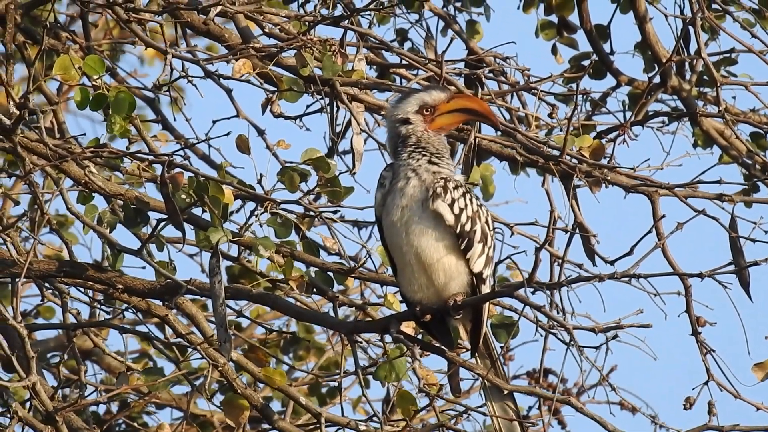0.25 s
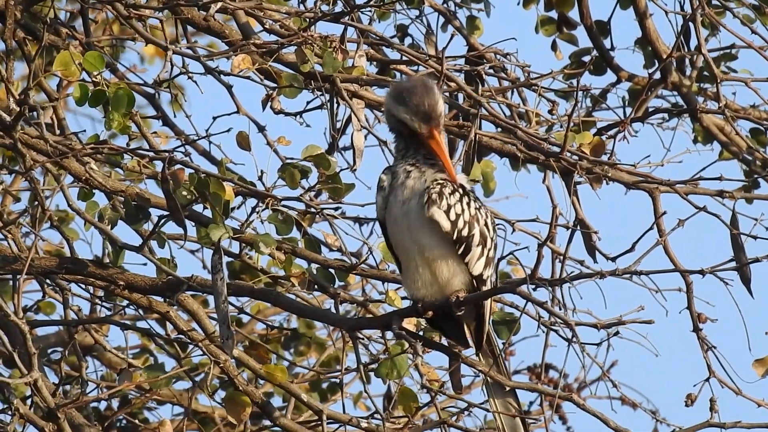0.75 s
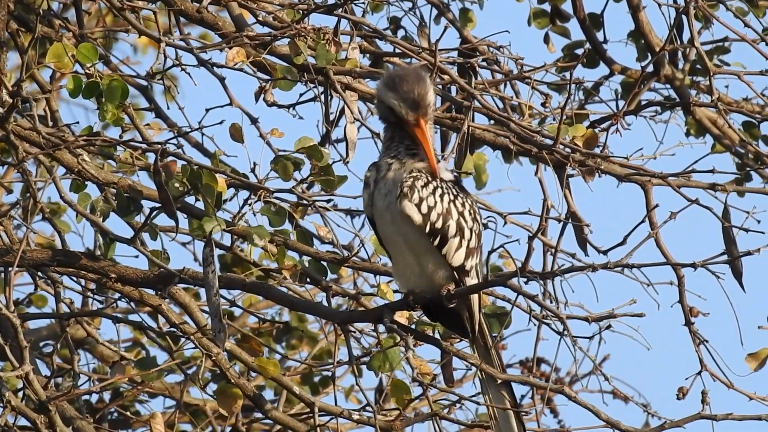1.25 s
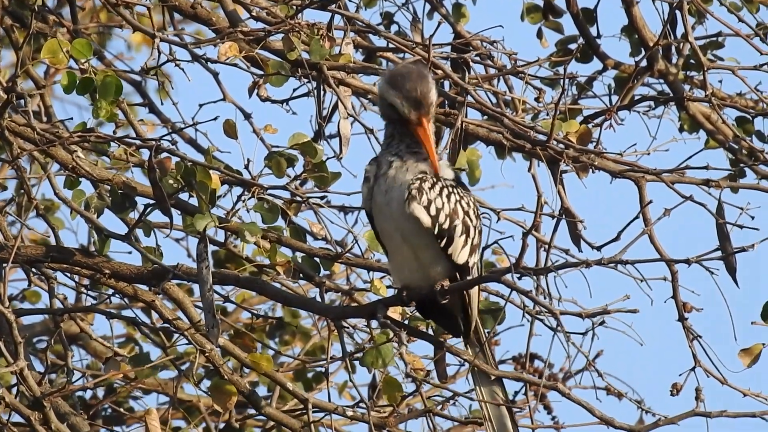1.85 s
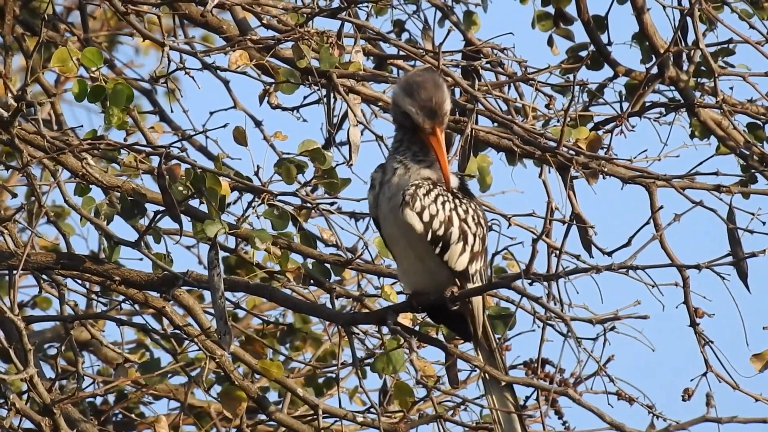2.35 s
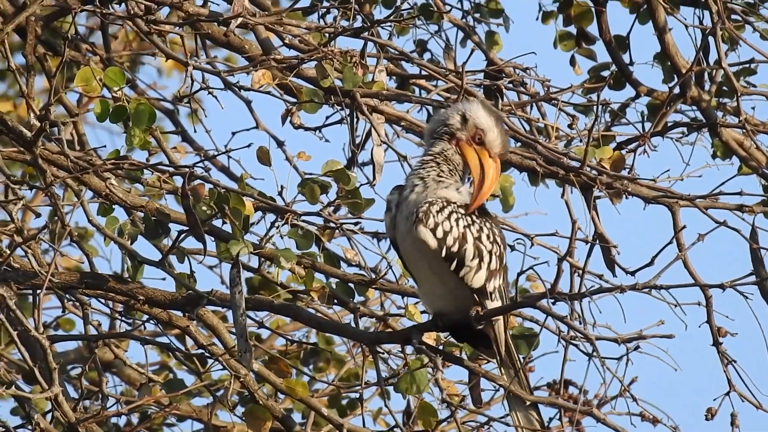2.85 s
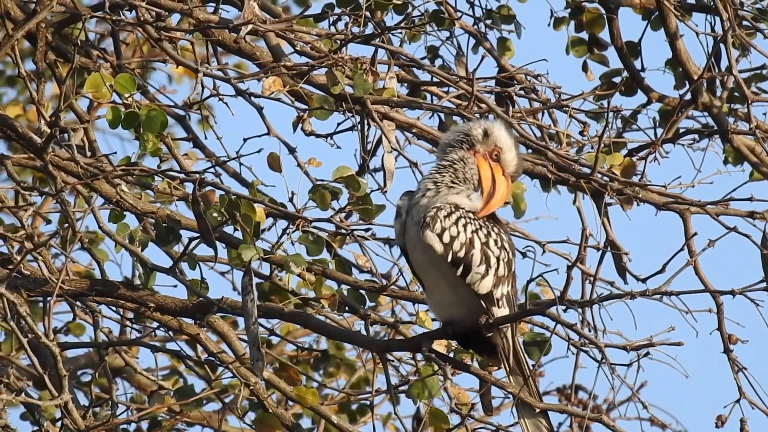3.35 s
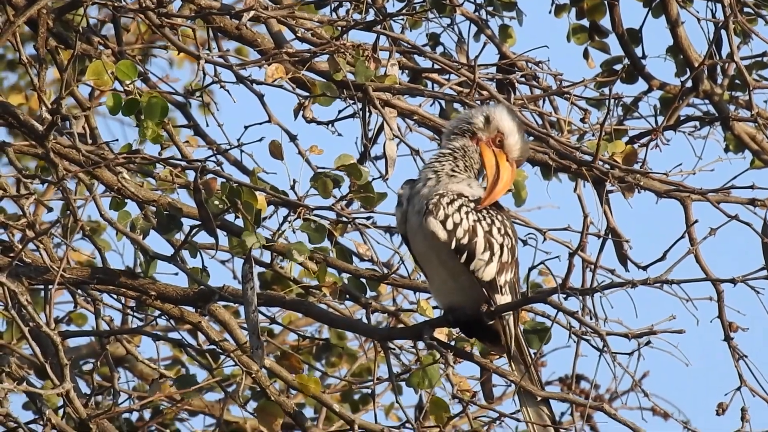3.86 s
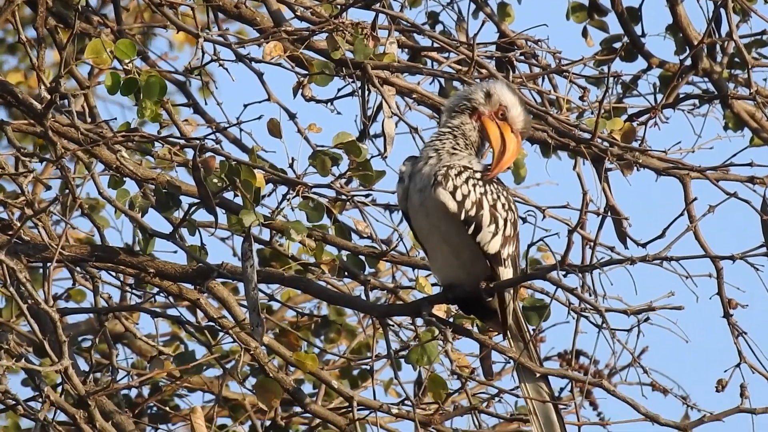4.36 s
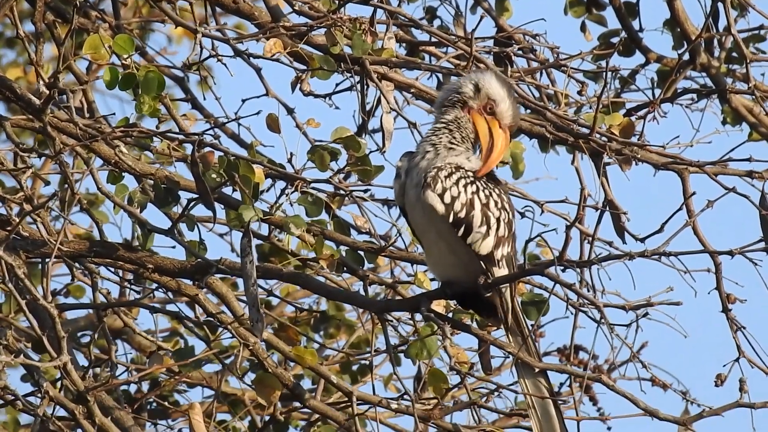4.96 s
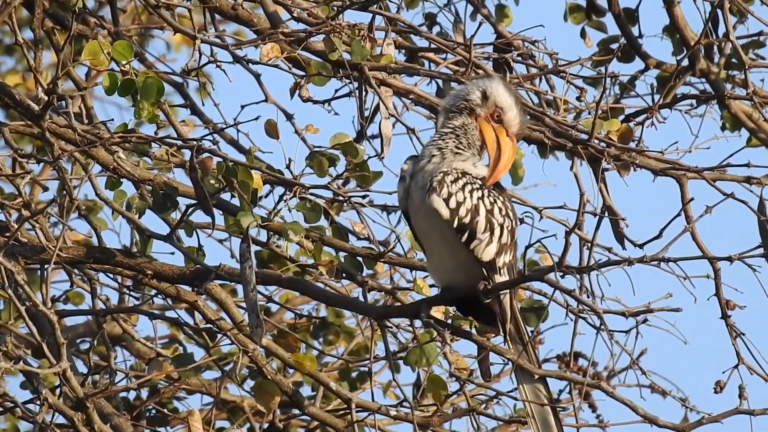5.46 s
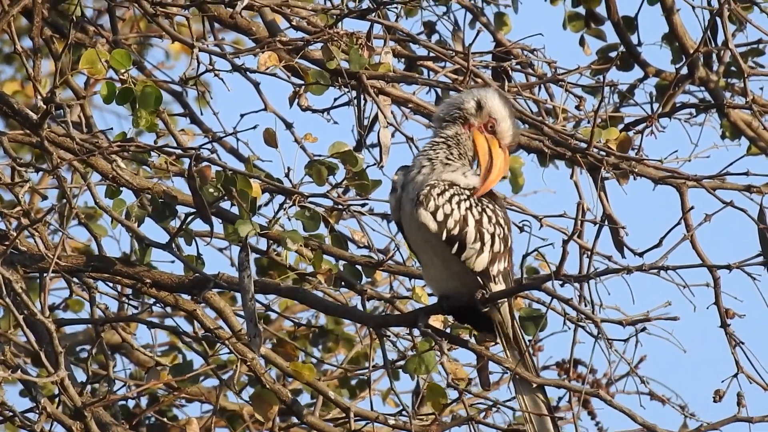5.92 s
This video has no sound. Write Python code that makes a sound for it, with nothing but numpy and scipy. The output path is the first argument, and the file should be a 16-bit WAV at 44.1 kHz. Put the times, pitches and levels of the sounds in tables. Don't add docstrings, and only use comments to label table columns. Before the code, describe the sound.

A hornbill in a tree clucks a long, even run of short hollow notes, echoing through bushland, with one sharp snap past the middle.

```python
import sys
import numpy as np
from scipy import signal
from scipy.fft import rfft, irfft
from scipy.io import wavfile
from scipy.ndimage import uniform_filter1d

SR = 44100
rng = np.random.default_rng(int(sys.argv[2]) if len(sys.argv) > 2 else 0)


def inscribe(sig):
    pcm = np.round(np.clip(np.atleast_2d(sig).T, -1, 1) * 32767)
    wavfile.write(sys.argv[1], SR, pcm.astype(np.int16))


def to_linear_factor(level_db):
    exponent = np.asarray(level_db, float) / 20
    return 10 ** exponent


N = 272979

# (time [s], pitch [Hz], effort [dB])
CLUCKS = [(0.093, 540.2, 0), (0.2545, 535, -1.5), (0.4533, 538, -0.7), (0.6528, 538.2, 0),
          (0.8492, 537, -0.5), (1.0574, 532.3, -0.5), (1.2591, 534, -1), (1.4249, 532.7, 1),
          (1.637, 534.8, 1.35), (1.8438, 532, 0.1), (2.015, 535, 1.5), (2.2105, 535.9, 1.36),
          (2.3722, 533.6, 1), (2.5489, 540.5, 1.66), (2.7353, 535.7, 1), (2.8962, 543.6, 1.06),
          (3.0789, 537.4, 1.5),
          (3.353, 550, 0.39), (3.534, 549.8, 0.32), (3.7668, 540.5, 1.56), (3.952, 538, 1.75),
              (4.1382, 538.5, 1.3), (4.4034, 531.7, 1.1), (4.7866, 535.7, 1.4), (5.0165, 535.7, 0.19),
              (5.232, 533.5, 0.89), (5.4348, 536.6, 1.63), (5.6202, 536.1, 1.6), (5.8173, 538.4, 2.1),
              (6.0083, 538, 1.3), (6.173, 536, 1.2)]
# (start [ms], attack [ms], hold [ms], release [ms], level [dB])
HARMONICS = [
    (-3, 4.94, 22.3, 9, -19.5),
    (2.23, 16.7, 2.62, 9.87, -1.07),
    (0, 7.3, 7, 9.6, -36),
    (1, 2.4, 7.9, 6.8, -41.5),
]
# (start [ms], attack [ms], hold [ms], release [ms], level [dB])
CREAK = [
    (25.8, 4.1, 9.9, 4.4, -29),
    (26.5, 2, 1.1, 6, -40.5),
]
# (start [ms], attack [ms], hold [ms], release [ms], level [dB])
WHEEZE = (22.5, 8, 2, 4, -1.5)
# (frequency [Hz], level [dB])
RASP_SPECTRUM = [(1100, -2.5), (1300, -0.5), (1900, -19), (2250, -8), (2600, -18.5), (6000, -25),
                 (9000, -30.5)]
RASP_DB = -34
RELAXED_HZ, RELAXED_LENGTH, STRETCH_PER_HZ2 = 533, .95, .001
CLUCK_FROM_MS, OPEN_MS, CLUCK_TO_MS = -3, 8, 34
HELD_SHARE, SAG_PER_MS = 1.034, .0032
ONSET_DROP, ONSET_MS, ONSET_WIDTH_MS = 0.395, 1.71, 0.72
CLOSE_DROP, CLOSE_MS, CLOSE_WIDTH_MS = 0.19, 27.85, 1.52


def hornbill():
    out, beam = np.zeros((2, N))
    rasp = to_linear_factor(RASP_DB) * colour(rng.standard_normal(N), RASP_SPECTRUM)
    for s, hz, db in CLUCKS:
        length = RELAXED_LENGTH + STRETCH_PER_HZ2 * max(hz - RELAXED_HZ, 0) ** 2
        t = np.arange(CLUCK_FROM_MS, CLUCK_TO_MS * length, 1000 / SR)
        t = np.where(t > OPEN_MS, OPEN_MS + (t - OPEN_MS) / length, t)

        onset = ONSET_DROP * fall(t, ONSET_MS, ONSET_WIDTH_MS)
        closing = CLOSE_DROP * (1 - fall(t, CLOSE_MS, CLOSE_WIDTH_MS))
        share = HELD_SHARE - SAG_PER_MS * t + onset - closing
        phase = 2 * np.pi * np.cumsum(hz * share) / SR

        low, octave, third, fourth = (swell(t, *row) for row in HARMONICS)
        creak_third, creak_fourth = (swell(t, *row) for row in CREAK)
        gains = [low, octave, creak_third, fourth + creak_fourth]
        voice = sum(gain * np.sin((k + 1) * phase + .84 * k) for k, gain in enumerate(gains))
        breath = np.sqrt(octave) + swell(t, *WHEEZE)
        air_noise = breath * rasp[int(s * SR) // 2:][:len(t)]

        start = s + CLUCK_FROM_MS / 1000
        add(out, to_linear_factor(db) * (voice + air_noise), start)
        add(beam, to_linear_factor(db) * third * np.sin(3 * phase + 1.7), start)
    return out, beam


# (left delay [ms], left gain [ratio], right delay [ms], right gain [ratio])
ECHOES = [(0, 1, 0, .92), (1.48, .47, 1.52, .57), (2.59, .23, 8.24, .23), (10.86, .34, 13.09, .05),
          (20.19, .27, 13.67, .24), (22.85, .14, 16.66, .27), (25.41, .61, 19.16, .18),
          (27.6, .08, 23.62, .44), (28.66, .42, 27.96, .95), (34.92, .11, 31.27, .55),
          (35.7, .09, 31.66, .21), (41.04, .1, 53.37, .08), (51.01, .26, 59.86, .14),
          (52.47, .21, 60.48, .12), (64.4, .08, 64.07, .06)]
SCATTER_DB, SCATTER_T60_S, SCATTER_RISE_S = -19.5, 0.24, 0.07


def surroundings():
    response = to_linear_factor(SCATTER_DB) * scatter(SCATTER_T60_S, SCATTER_RISE_S)
    for side, (ms, gain) in enumerate(np.transpose(ECHOES).reshape(2, 2, -1)):
        response[side, (ms * SR / 1000).round().astype(int)] += gain
    return response


def scatter(t60, rise):
    t = np.arange(SR) / SR
    tail = rng.standard_normal((2, SR)) * patches(SR, 14, 7)
    tail = tail * (1 - np.exp(-(t / rise) ** 2)) * to_linear_factor(-60 * t / t60)
    return tail / np.sqrt(np.mean(np.sum(tail ** 2, axis=1)))


# (frequency [Hz], density [dB per Hz])
SNAP_SPECTRUM = [(120, -36), (200, 2.5), (612, 3), (1100, -4.5), (1500, -3.5), (1770, -12), (1980, 0.5),
                 (2170, -12), (3690, -6.5), (4680, -17), (6640, -14.5), (7270, -17), (14600, -34),
                 (16000, -56)]
# (frequency [Hz], T60 [s])
SNAP_T60 = [(300, 0.16), (2000, 0.22), (6000, 0.16), (15000, 0.22)]
SNAP_S, SNAP_DB, SNAP_PAN_DB, CRACK_DB = 3.6557, -10, -0.5, -4
SNAP_RISE_CYCLES = 8


def snap():
    t = np.arange(SR // 2) / SR
    noise = colour(rng.standard_normal((2, len(t))), SNAP_SPECTRUM)
    spectrum, hz = rfft(noise), np.fft.rfftfreq(len(t), 1 / SR)
    body = np.zeros((2, len(t)))
    for low_hz in 200 * 2. ** np.arange(0, 7):
        octave = irfft(spectrum * (hz >= low_hz) * (hz < 2 * low_hz), len(t))
        decay = to_linear_factor(-60 * t / on_log(1.8 * low_hz, SNAP_T60))
        body += octave * decay * np.minimum(t * low_hz / SNAP_RISE_CYCLES, 1)
    crack = 1 + to_linear_factor(CRACK_DB) * np.exp(-t / .006)
    burst = body * patches(len(t), 2.5, 2.5) * crack * np.minimum(t / .0008, 1)
    out = np.zeros((2, N))
    add(out, burst * to_linear_factor(SNAP_DB + SNAP_PAN_DB * np.array([[1], [-1]])), SNAP_S)
    return out


# (time [s], length [s], level [dB])
PURRS = [
    (1.35, 0.085, -39.5),
    (1.68, 0.44, -38.5),
    (2.04, 0.17, -32.5),
    (2.63, 0.068, -33),
    (3.04, 0.43, -33.5),
    (3.9, 0.049, -27.5),
    (4.308, 0.407, -33),
    (5.091, .1, -32),
    (5.54, 0.42, -32.5),
    (5.98, 0.1, -27),
]
PURR_HZ, PURR_SAG_HZ_PER_S, PURR_SWELL_DB_PER_S, PURR_EDGE_S = 822, 50, 8, .02
PURR_RATE_HZ, PURR_DROOP, PURR_UNEVEN, PURR_SCATTER_DB = 30, .15, .22, 2.5
PURR_LOW_DB, PURR_WET_DB = -12, -3


def far_bird():
    out = np.zeros(N)
    for s, length, db in PURRS:
        t = np.arange(0, length, 1 / SR)
        spacing, size, pitch = rng.standard_normal((64, 3)).T
        starts = np.cumsum(np.exp(PURR_UNEVEN * spacing)) / PURR_RATE_HZ - 1 / PURR_RATE_HZ
        count = np.interp(t, starts, np.arange(64))
        hoot, beat = count.astype(int), count % 1
        bend = 1 + PURR_DROOP * (.5 - beat) + .03 * pitch[hoot]
        phase = 2 * np.pi * np.cumsum((PURR_HZ - PURR_SAG_HZ_PER_S * t) * bend) / SR
        throb = np.sin(np.pi * beat) ** 1.1 * to_linear_factor(PURR_SCATTER_DB * size[hoot])
        voice = np.sin(phase) + to_linear_factor(PURR_LOW_DB) * np.sin(phase / 2)
        edges = np.minimum(np.minimum(t, length - t) / PURR_EDGE_S, 1)
        add(out, 2 * to_linear_factor(db + PURR_SWELL_DB_PER_S * t) * edges * throb * voice, s)
    return out + to_linear_factor(PURR_WET_DB) * through(out, scatter(.25, .006))


# (time [s], length [s], centre [Hz], width [Hz], level [dB])
RUSTLES = [
    (0.552, 0.016, 5450, 900, -52.5),
    (0.65, 0.047, 6000, 2500, -54),
    (.92, 0.035, 7300, 1500, -59),
    (2.764, 0.033, 6100, 1200, -48.5),
    (4.208, 0.071, 4750, 1497, -51.5),
    (4.211, 0.045, 1890, 1100, -49.5),
    (4.565, 0.078, 4470, 1500, -54),
    (4.563, 0.054, 1450, 800, -44),
    (5.379, 0.075, 1540, 786, -42.5),
    (5.383, 0.067, 4700, 2500, -53),
]


def rustles():
    out = np.zeros((2, N))
    for s, length, hz, width, db in RUSTLES:
        noise = rng.standard_normal((2, 8192))
        skirts = [(hz - width, -30), (hz - width / 2, 0), (hz + width / 2, 0), (hz + width, -30)]
        band = colour(noise, skirts)
        t = np.arange(8192) / SR / length
        envelope = (1 - np.exp(-12 * t)) * np.exp(-1.5 * t)
        add(out, to_linear_factor(db + 14.5) * patches(8192, 2.0, 1.6) * band * envelope, s)
    return out


# (frequency [Hz], density [dB per Hz])
AIR_SPECTRUM = [(12, -36), (20, -9.5), (91, 0), (270, -8.5), (472, -7.5), (542, -8.5), (738, -8),
                (1000, -7.5), (1260, -19.5), (1810, -22.5), (1960, -23), (4420, -27.5), (6910, -28),
                (14700, -36), (16000, -42)]
# (frequency [Hz], left-right likeness [0-1])
ALIKE = [(40, .97), (90, .96), (170, .85), (300, .55), (600, .1), (1000, 0)]
AIR_DB = -31
DRONE_HZ, DRONE_WIDTH_HZ, DRONE_DB = 60, 14, -41


def air():
    hz = np.fft.rfftfreq(N, 1 / SR)
    alike = on_log(hz, ALIKE)
    mid, side, hum = rfft(rng.standard_normal((3, N)))
    shared, own = mid * np.sqrt(1 + alike), side * np.sqrt(1 - alike)
    pair = irfft([shared + own, shared - own], N)
    drone = irfft(hum / (1 + ((hz - DRONE_HZ) / DRONE_WIDTH_HZ) ** 2), N)
    balance_db = 0.081 * np.array([[-1], [1]])
    return to_linear_factor(AIR_DB + balance_db) * colour(pair, AIR_SPECTRUM) + to_linear_factor(DRONE_DB) * drone / drone.std()


def on_log(hz, table):
    return np.interp(np.log(np.maximum(hz, 1)), np.log([r[0] for r in table]), [r[1] for r in table])


def colour(x, table):
    gain = to_linear_factor(on_log(np.fft.rfftfreq(x.shape[-1], 1 / SR), table))
    y = irfft(rfft(x) * gain, x.shape[-1])
    return y / np.sqrt(np.mean(y ** 2))


def add(track, x, s):
    i = int(s * SR)
    track[..., i:i + x.shape[-1]] += x[..., :track.shape[-1] - i]


def through(x, response):
    return signal.fftconvolve(x[None], response, axes=1)[:, :N]


def patches(count, ms, db):
    k = int(ms * SR / 1000)
    steps = np.repeat(rng.standard_normal((2, count // k + 1)), k, axis=1)
    return to_linear_factor(db * uniform_filter1d(steps, k)[:, :count])


def swell(t, start, attack, hold, release, db):
    return to_linear_factor(db) * np.interp(t, np.cumsum([start, attack, hold, release]), [0, 1, 1, 0])


def fall(t, middle, width):
    return 1 / (1 + np.exp((t - middle) / width))


def scene():
    voice, beam = hornbill()
    return through(voice, surroundings()) + beam + snap() + far_bird() + rustles() + air()


def low_pass(x):
    return signal.sosfilt(signal.butter(12, 16520, fs=SR, output="sos"), x)


CEILING, KNEE, TOP_HZ = .585, 14, 15830


def record(dry):
    flat = dry / (1 + np.abs(dry / CEILING) ** KNEE) ** (1 / KNEE)
    flat = signal.sosfilt(signal.ellip(10, .2, 60, TOP_HZ, fs=SR, output="sos"), flat)
    mix = flat * np.minimum(np.arange(N, 0, -1) / 80, 1)
    return low_pass(mix)


dry = scene()
out = record(dry)
inscribe(out)
```